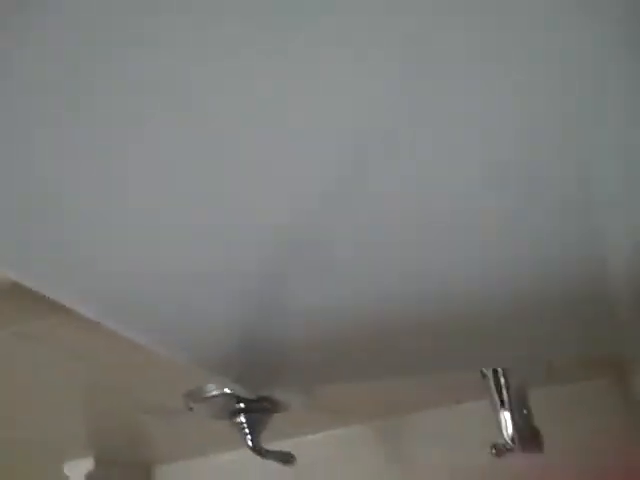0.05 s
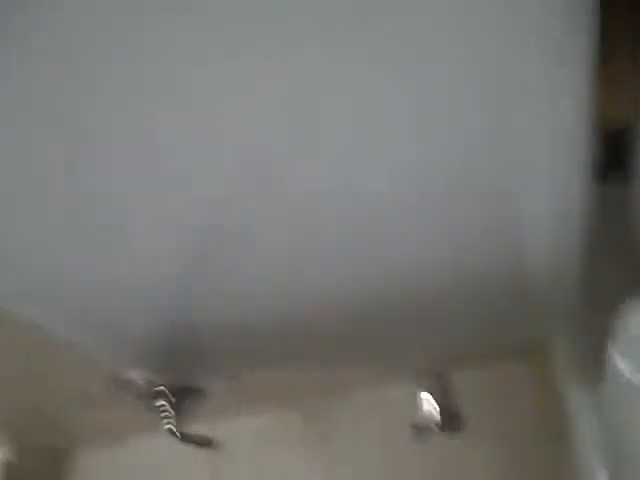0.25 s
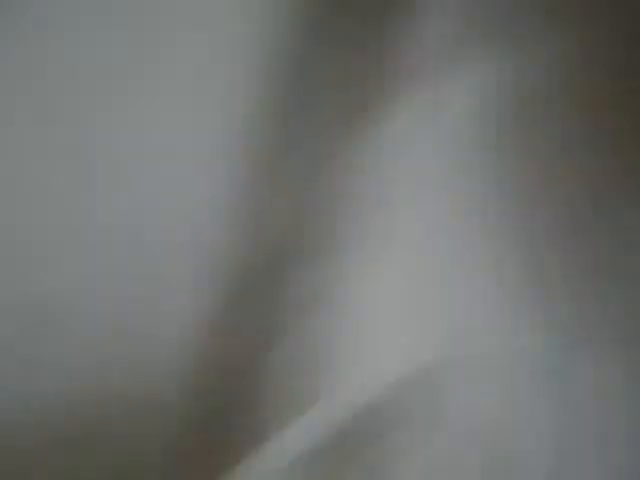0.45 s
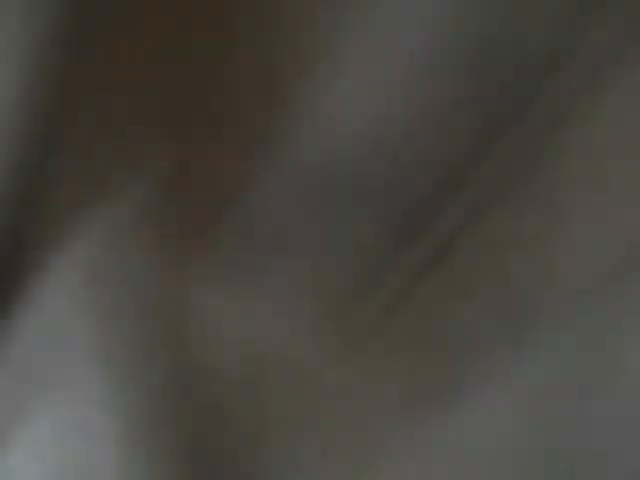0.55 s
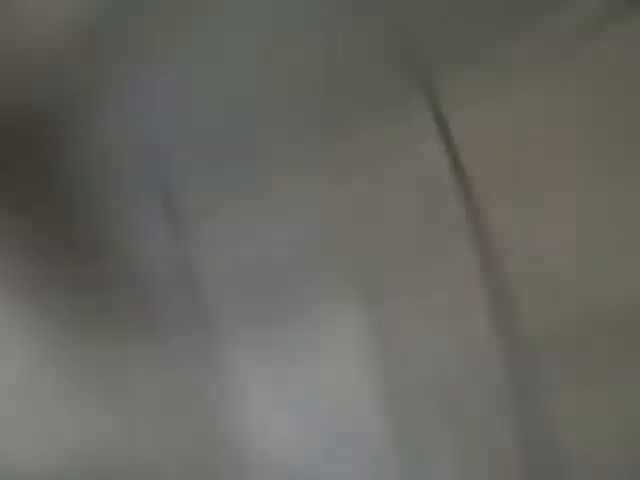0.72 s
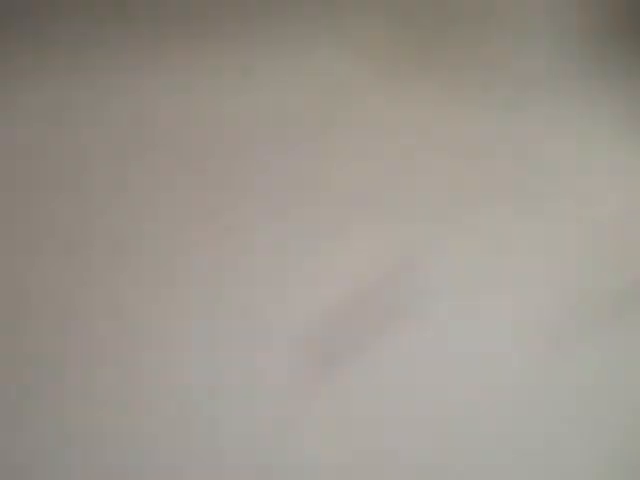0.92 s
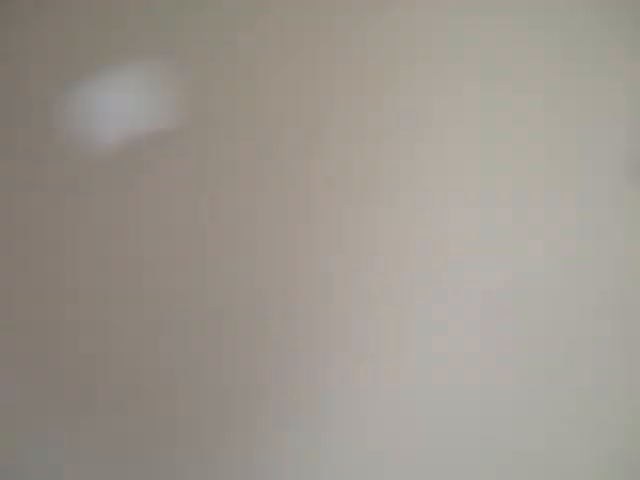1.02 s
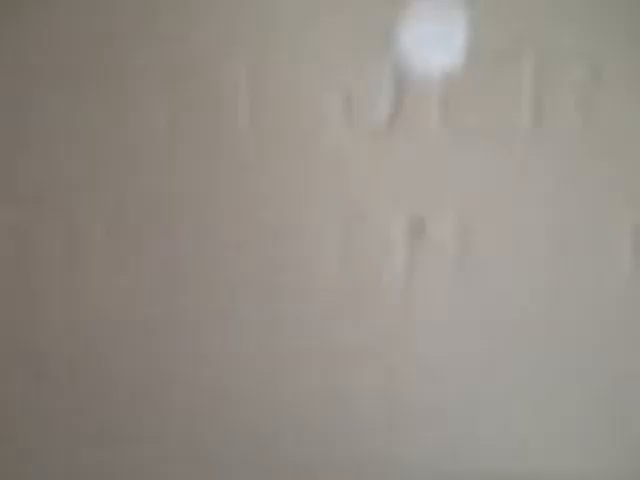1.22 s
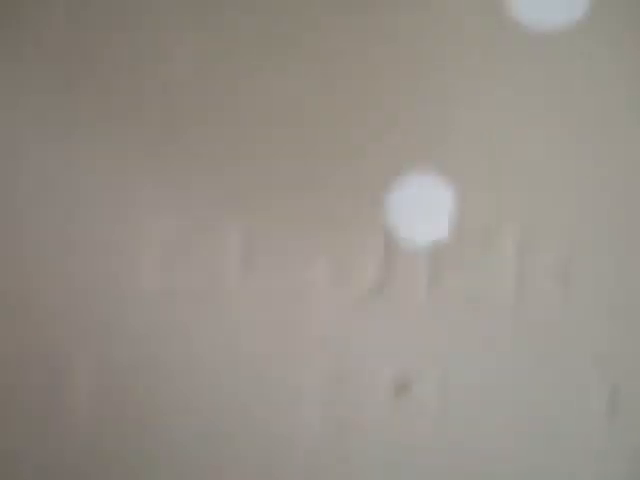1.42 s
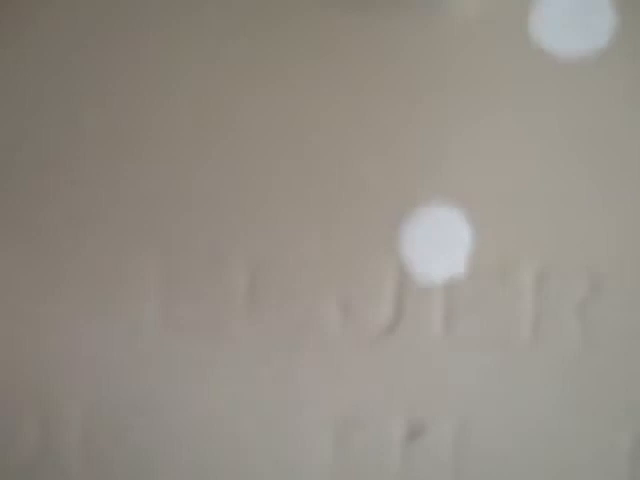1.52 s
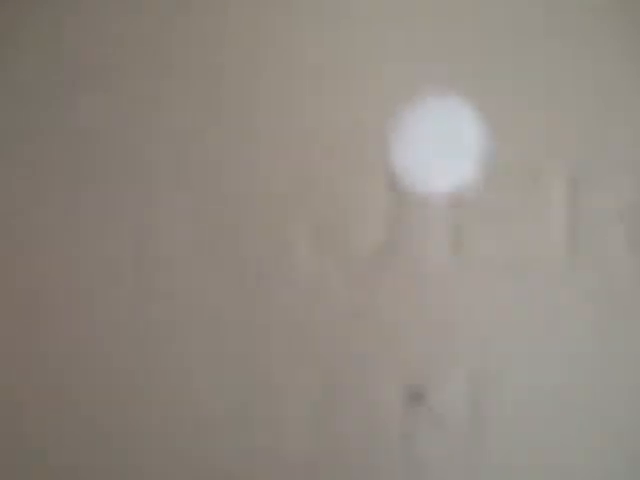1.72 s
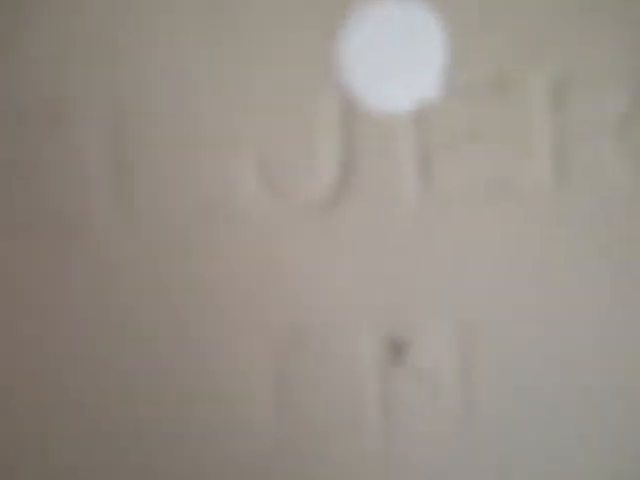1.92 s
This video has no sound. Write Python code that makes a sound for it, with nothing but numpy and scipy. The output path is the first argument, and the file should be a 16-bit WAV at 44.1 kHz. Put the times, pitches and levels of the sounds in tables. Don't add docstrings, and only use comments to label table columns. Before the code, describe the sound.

Close, slightly overloaded clunk of a heavy porcelain lid landing with a quick second knock and short hard room reflections, then faint hand rubs, plastic case clicks and thin squeaks over a soft room hush.

```python
import sys
import numpy as np
from scipy import signal
from scipy.fft import rfft, irfft
from scipy.io import wavfile
from scipy.ndimage import uniform_filter1d

SR = 44100
rng = np.random.default_rng(int(sys.argv[2]) if len(sys.argv) > 2 else 0)


def wav_out(sig):
    wavfile.write(sys.argv[1], SR, np.round(np.clip(np.atleast_2d(sig).T, -1, 1) * 32767).astype(np.int16))


def invert_db(x):
    u = np.asarray(x, float) / 20
    return 10 ** u


N = 85995

# start in seconds, level of the room in dB, push of air in dB.
CONTACTS = [
    (0.2387, -19.5, -29),
    (0.2504, -30, -71),
    (0.2655, -35, -56),
    (0.2931, -32, -40.5),
    (0.3015, -30, -48),
]


def evened(x):
    return x / np.sqrt(np.mean(x ** 2) + 1e-20)


def read(points, hz):
    f, value = np.transpose(points)
    return np.interp(np.log(hz + 1), np.log(f + 1), value)


def add(mix, s, sound):
    part = mix[round(s * SR):][:len(sound)]
    part += sound[:len(part)]


def coloured(x, db_of_hz):
    hz = np.fft.rfftfreq(len(x), 1 / SR)
    return evened(irfft(rfft(x) * invert_db(db_of_hz(hz)), len(x)))


def ring(hz, db, t60, phase=0, rise=0.00021):
    t = np.arange(SR // 2) / SR
    shape = invert_db(-60 * t / t60) * (1 - np.exp(-t / rise))
    return invert_db(db) * shape / shape.max() * np.sin(2 * np.pi * (hz * t + phase))


def lid():
    # frequency in Hz, level in dB, t60 in seconds.
    blow_modes = [(130, -38, .14), (180, -39, .5), (258, -40, .35), (310, -35, .48), (336, -31, .25),
                  (384, -29, .1), (412, -26, .09), (490, -33, .1), (580, -26, .16), (803, -29, .13),
                  (1097, -23, .16), (1250, -34, .2), (1320, -33, .1), (1432, -30, .09)]
    bounce_modes = [(381, -31, .26), (412, -35, .12), (567, -41, .42), (578, -32, .09), (730, -38, .15),
                    (960, -42, .35), (1012, -31, .12), (1100, -30, .11), (1132, -34, .25), (322, -43, .25),
                    (1320, -44, .25), (1384, -46, .3), (1432, -39, .17), (1720, -33, .2)]
    # peak in seconds, level in dB, frequency in Hz, length in seconds.
    cracks = [(.2394, -10, 5500, .0012), (.2408, -14, 4300, .0012), (.2418, -13, 3050, .0013),
              (.2438, -16, 1500, .0013), (.2456, -18, 4900, .0012), (.2528, -21, 1100, .0015),
              (.2668, -15, 5400, .0009), (.2668, -21, 3700, .0009), (.2668, -27, 7000, .0008),
              (.2942, -19, 1300, .0007), (.2960, -30, 6000, .0015), (.3020, -16, 5400, .0009),
              (.3020, -19, 3900, .0009), (.3020, -26, 7000, .0008), (.3022, -41, 13000, .001)]
    out = np.zeros(N)
    phases = rng.random(len(blow_modes))
    for s, modes, rise in ((.2407, blow_modes, .001), (.2945, bounce_modes, .003)):
        for (hz, db, t60), phase in zip(modes, phases):
            add(out, s, ring(hz, db, t60, phase, rise))

    u = np.arange(2000) / SR / 0.001
    for s, room_db, push_db in CONTACTS:
        add(out, s, invert_db(room_db) * clatter())
        add(out, s, -invert_db(push_db) * u * np.exp(1 - u))

    for s, db, hz, length in cracks:
        t = np.arange(-length, 2 * length, 1 / SR)
        side = np.where(t < 0, length, 2 * length)
        bell = np.exp(-(2 * t / side) ** 2 * 2)
        add(out, s - length, invert_db(db) * bell * np.sin(2 * np.pi * (hz * t + rng.random())))
    return out


def clatter():
    # frequency in Hz, level in dB per Hz.
    colour = [(100, -36), (150, -17), (400, -14.5), (1000, -15), (2200, -8), (5500, -10), (8000, -15),
              (16000, -32.5)]
    # frequency in Hz, t60 of the room in seconds.
    decay = [(100, 0.67), (260, 0.24), (700, 0.44), (1840, 0.21), (4850, 0.21), (12800, 0.1)]
    noise = coloured(rng.standard_normal(SR // 2), lambda f: read(colour, f))
    hz, t, z = signal.stft(noise, SR, nperseg=256, noverlap=192)
    z = z * invert_db(-60 * t / read(decay, hz)[:, None])
    tail = signal.istft(z, SR, nperseg=256, noverlap=192)[1]
    return tail * np.minimum(np.arange(len(tail)) / SR / 0.0014, 1) ** 2


def tank():
    # frequency in Hz, level in dB, t60 in seconds.
    tank_modes = [(1960, -7, .12), (2008, -8, .13), (2405, -11, .12), (2688, -7, .1), (2915, -8, .1),
                  (3424, -10, .12), (3473, -9, .12), (4191, -9, .12), (4570, -10, .12), (5113, -10, .12),
                  (5337, -8, .1), (6720, -14, .08)]
    shares = [-28, -39, -37, -38, -33]
    out = np.zeros(N)
    phases = rng.random((len(CONTACTS), len(tank_modes)))
    for contact, share_db, row in zip(CONTACTS, shares, phases):
        for (hz, db, t60), phase in zip(tank_modes, row):
            add(out, contact[0] + .001, ring(hz, share_db + db, t60, phase, rise=.001))
    return out


def hand():
    # start in seconds, level in dB, frequency in Hz, t60 in seconds.
    ticks = [(.0388, -55.5, 670, 0.034), (0.4764, -44.5, 795, .004), (.5350, -46, 900, 0.008),
             (0.5343, -49, 11700, 0.0024), (.593, -66, 8000, .002), (0.7349, -42, 700, .011),
             (0.7352, -47, 540, 0.018), (0.7362, -53, 5500, .006), (.7356, -34.5, 8300, 0.0017),
             (0.735, -48, 2300, 0.008), (0.8021, -43, 2000, 0.0033), (0.8885, -42, 1930, 0.005),
             (.8878, -44, 3300, 0.003), (0.9282, -45, 2100, 0.003), (.976, -48, 1090, 0.0062),
             (1.083, -54, 9500, 0.00195), (1.1492, -36, 1130, 0.0075), (1.1490, -40.5, 3780, 0.0063),
             (1.1485, -46, 8650, 0.0016), (1.1487, -49, 12900, 0.0026), (1.1483, -46, 15700, .003),
             (1.306, -54.5, 751, 0.027), (1.306, -52, 1900, 0.022), (1.557, -50, 300, 0.01),
             (1.735, -55.5, 760, 0.024), (.7358, -50, 3350, .007), (.7362, -51, 4300, .007),
             (.7362, -50, 6400, .007), (1.1487, -47, 1800, .005)]
    # start in seconds, rise in seconds, fade t60 in seconds, level in dB, centre in Hz.
    rubs = [(.07, 0.027, 0.22, -85, 5040), (0.401, 0.18, 3.5, -73.5, 1494),
            (1.311, 0.0067, 0.19, -59.5, 453), (1.5, .2, 0.22, -63.5, 1800), (0.74, 0.03, 0.3, -63, 13000),
            (0.661, 0.044, 0.4, -73.5, 12850), (0.172, 0.05, 0.16, -65.5, 5300),
            (0.534, .004, 0.28, -65.5, 10440), (0.572, 0.0059, 0.096, -64, 8660),
            (0.64, 0.011, 0.097, -58.5, 5500), (0.7332, 0.0032, 0.13, -44.5, 8500),
            (0.748, 0.048, 0.48, -54, 8700), (.87, 0.014, 0.26, -56.5, 8640),
            (0.901, 0.061, 1.25, -66, 9000), (0.959, 0.014, 0.11, -63.5, 4970),
            (1.201, 0.068, 0.29, -61.5, 9100), (1.305, 0.0024, 0.22, -48.5, 7160),
            (1.43, 0.042, 0.24, -56.5, 7820), (1.52, 0.11, 1.3, -61.5, 9000),
            (1.63, 0.099, 0.12, -61, 12640), (1.361, .05, 0.46, -66.5, 5950),
            (1.84, 0.018, 0.16, -63, 11160), (1.872, 0.037, 0.36, -59.5, 8030)]
    # start in seconds, rise in seconds, fade t60 in seconds, level in dB, centre in Hz.
    scrapes = [(0.74, 0.1, .7, -60, 45), (1.175, 0.041, .15, -73, 36), (.81, 0.027, 0.32, -66, 2200),
               (0, 0.07, 0.5, -69, 192), (0.0034, 0.019, 0.38, -67, 312), (0.047, .015, 0.21, -65, 685),
               (0.033, .05, .38, -77, 5150), (0.14, .05, 0.17, -73, 5350), (0.42, .08, 0.91, -73, 4400),
               (0.68, 0.036, .45, -70, 8200), (0.78, 0.085, 0.96, -68, 12800),
               (1.14, 0.067, 0.41, -68.5, 10500), (1.51, 0.065, 0.33, -67, 14000),
               (1.8, 0.012, 0.36, -78, 310), (1.6, 0.13, .18, -70, 750), (1.875, 0.028, .28, -65, 7800),
               (1.875, 0.026, 0.42, -67, 2200)]
    out = np.zeros(N)
    for s, *row in ticks:
        add(out, s, tick(*row))
    for s, *row in rubs:
        add(out, s, rub(*row, octaves=1.95))
    for s, *row in scrapes:
        add(out, s, rub(*row, octaves=.25))
    return out


def tick(db, hz, t60):
    a, b = rng.random(2)
    modes = ring(hz, db, t60)
    modes += ring(hz * (1.324 + 0.07 * a), db - 3.5, t60 * 0.23, b)
    modes += ring(hz * (.85 - 0.16 * b), db - 12, t60 * 0.79, a)
    t = np.arange(600) / SR
    snap = coloured(rng.standard_normal(600), lambda f: -6 * (np.log2((f + 200) / (2.3 * hz)) / 3.0) ** 2)
    modes[:600] += snap * invert_db(db - 13.5 - 60 * t / 0.0069)
    thin = signal.butter(4, .5 * hz, 'high', fs=SR)
    return signal.lfilter(*thin, modes)


def rub(rise, t60, db, hz, octaves):
    t = np.arange(SR) / SR
    grain_db = 0.5 * evened(uniform_filter1d(rng.standard_normal(SR), 60))
    noise = rng.standard_normal(SR) * invert_db(grain_db)
    z = signal.stft(noise, nperseg=256)[2]
    patches = uniform_filter1d(rng.standard_normal(z.shape), 5, 0)
    patches = evened(uniform_filter1d(patches, 9, 1))
    noise = signal.istft(z * invert_db(1.6 * patches), nperseg=256)[1][:SR]

    def band_db(f):
        return -6 * (np.log2((f + 20) / hz) / octaves) ** 2 - 8 * (f / 16000) ** 12

    swell = np.sin(np.pi / 2 * np.minimum(t / rise, 1)) ** 2
    fade = invert_db(-60 * np.maximum(t - rise, 0) / t60)
    return invert_db(db) * swell * fade * coloured(noise, band_db)


def squeaks():
    # start in seconds, rise in seconds, fade t60 in seconds, level in dB, centre in Hz.
    slips = [
        (.94, .05, .3, -70, 12500),
        (1.01, .04, .25, -70, 12900),
        (.738, .008, .06, -56, 7500),
        (.87, .018, .12, -66, 10000),
    ]
    out = np.zeros(N)
    for s, *row in slips:
        add(out, s, rub(*row, octaves=.05))
    return out


def room():
    # frequency in Hz, level in dB per Hz.
    hush_colour = [(20, -8), (228, -8), (1260, -11), (2670, -14), (6910, -20), (12800, -24), (14500, -26),
                   (16000, -27)]
    # frequency in Hz, width in Hz, level in dB.
    mid_rubs = [
        (2600, 200, -74),
        (3700, 260, -76),
        (1070, 890, -71.5),
    ]
    open_hand = (0.517, 1.283)
    t = np.arange(N) / SR
    out = invert_db(-67.5) * coloured(rng.standard_normal(N), lambda f: read(hush_colour, f))

    is_open = uniform_filter1d(1. * (t > open_hand[0]) * (t < open_hand[1]), 3000)
    for hz, width, db in mid_rubs:
        rub_band = coloured(rng.standard_normal(N), lambda f: -10 * np.log10(1 + (2 * (f - hz) / width) ** 4))
        out += is_open * invert_db(db) * rub_band

    lumps = invert_db(1.3 * evened(uniform_filter1d(rng.standard_normal(N), 4000)))
    rumble = coloured(rng.standard_normal(N), lambda f: -10 * np.log10(1 + (f / 45) ** 4))
    return out + invert_db(-80) * lumps * rumble


def scene():
    return (lid() + tank() + hand() + squeaks() + room())[None]


def top_cut(x):
    return signal.sosfilt(signal.butter(12, 16480, fs=SR, output="sos"), x)


def record(dry):
    limit, edge_hz = .8, 15850
    loud = limit * np.tanh(dry / limit)
    lowpass = signal.firwin(255, edge_hz, window=("kaiser", 9), fs=SR)
    mix = signal.oaconvolve(loud, lowpass[None], "same") - .0004
    return top_cut(mix)


dry = scene()
out = record(dry)
wav_out(out)
```